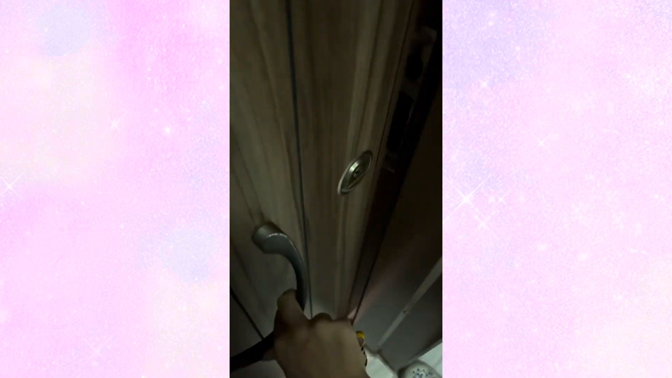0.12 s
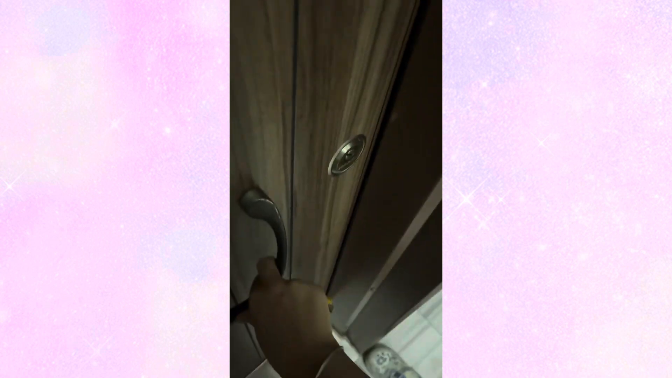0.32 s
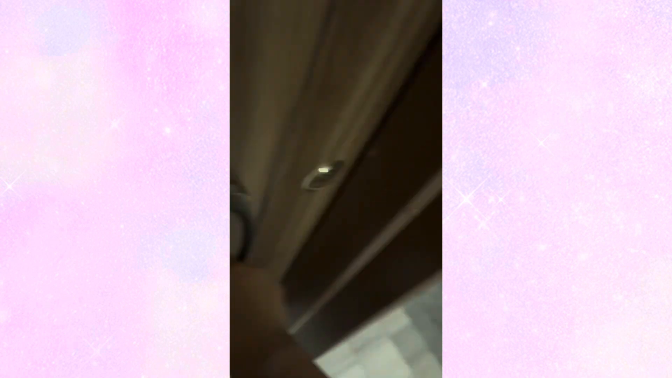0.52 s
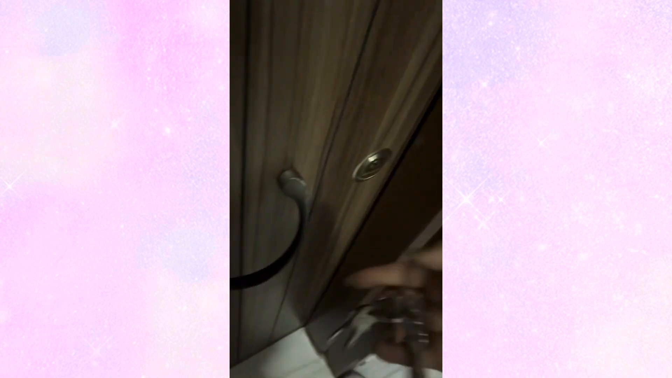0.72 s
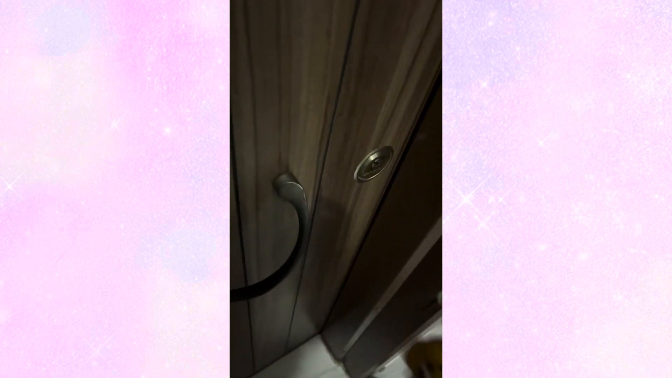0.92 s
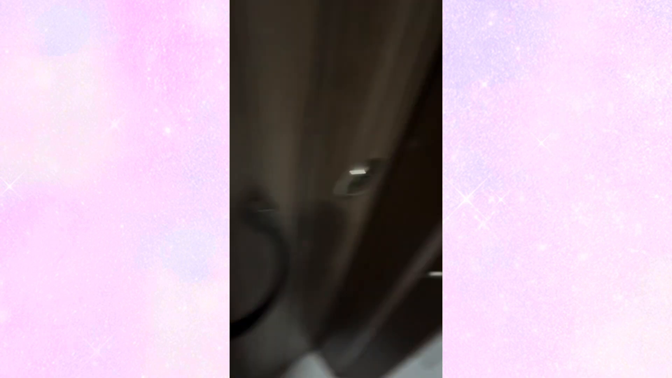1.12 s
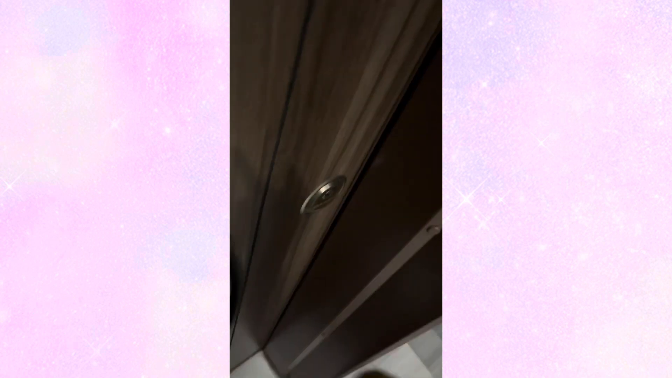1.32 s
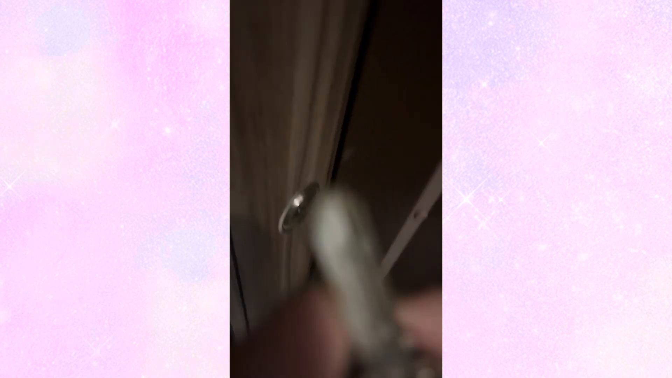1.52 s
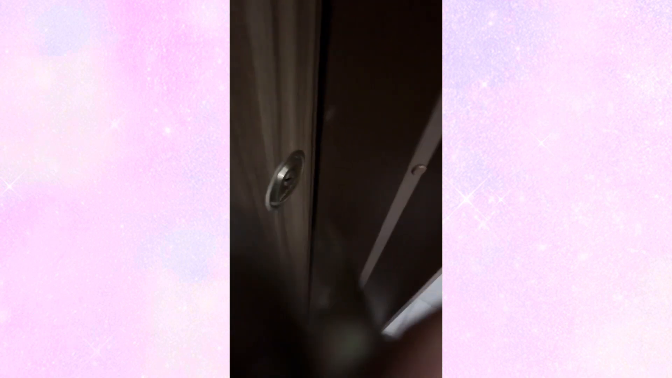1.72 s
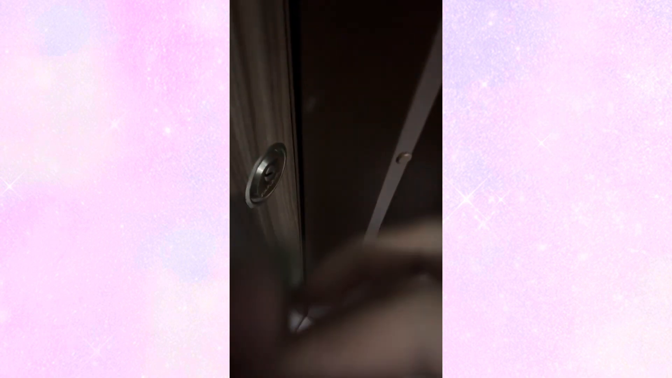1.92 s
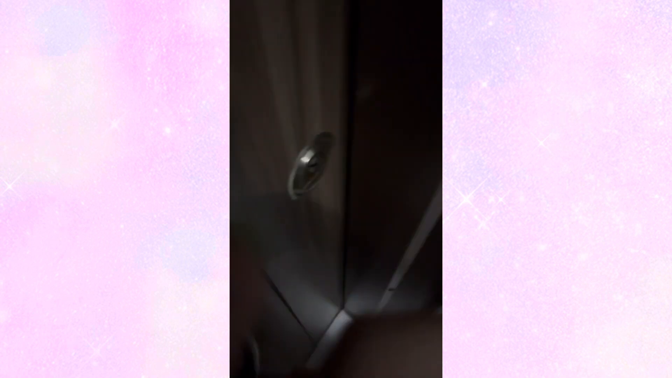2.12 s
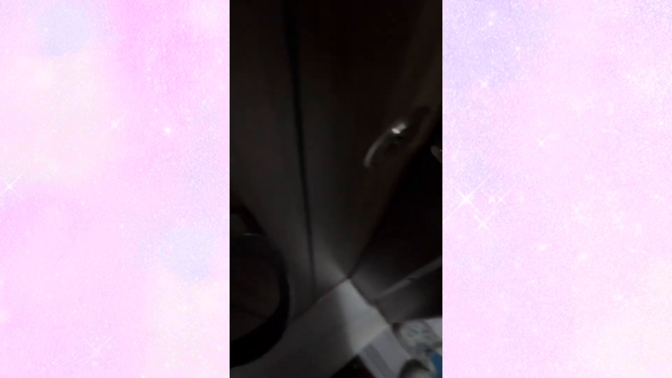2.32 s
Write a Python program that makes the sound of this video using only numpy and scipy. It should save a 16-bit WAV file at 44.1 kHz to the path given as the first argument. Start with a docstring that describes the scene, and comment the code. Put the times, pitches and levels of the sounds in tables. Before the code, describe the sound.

Door lock bolt clacking on an echoing landing, followed by jangling keys and a latch click.

```python
"""A door lock at arm's length from a stereo microphone, worked three times on a hard-walled landing.
The bolt slides and hits its stop, and each clack rings through the door and echoes off the walls.
A bunch of keys then clinks in the hand and jangles right by the microphone, key striking key,
with soft bumps and rubs of handling. At the end the door knocks in its frame and the latch clicks."""
import sys
import numpy as np
from scipy import signal
from scipy.fft import rfft, irfft
from scipy.io import wavfile

SR = 44100
rng = np.random.default_rng(int(sys.argv[2]) if len(sys.argv) > 2 else 0)


def materialize(psi):
    """Save the field psi as 16-bit PCM at rate SR to the path in sys.argv[1].

    A 1-D psi becomes a single channel; in a 2-D psi each row is a channel.
    """
    bounded = np.clip(np.atleast_2d(psi).T, -1, 1)
    quanta = np.round(bounded * 32767).astype(np.int16)
    wavfile.write(sys.argv[1], SR, quanta)


N = 110250
T = np.arange(N) / SR
FREQS = np.arange(N + 1) * SR / (2 * N)

# Still air on the landing. Each row: frequency in Hz, level in dB.
AIR_SPECTRUM = [(25, -41.5), (120, -44), (300, -51.5), (700, -60), (1600, -57.5), (3200, -54.5),
                (6000, -63.5), (10000, -74), (16000, -71.5)]
# Hand and sleeve, close up. Each row: middle in seconds, level in dB, half length in seconds, centre in Hz.
RUBS = [(0.142, -39.5, 0.034, 1070), (1.113, -47, 0.046, 1130), (1.627, -45.5, 0.032, 3400),
        (1.68, -40, 0.016, 755), (1.724, -44, 0.025, 2940), (1.885, -41.5, 0.0084, 1390),
        (1.966, -34, 0.024, 1340), (2.064, -48, 0.051, 1370)]

# Blows of the bolt. Each row: impact in seconds, level in dB, rise and slide before the stop in seconds,
# then slide, bass, body, snap, treble and door ring in dB, and the door's favoured pitch in Hz.
CLACKS = [(.211, -11.5, 0.0055, .007, -9, -12, -0.5, 3.5, 0.5, 1.5, 350),
          (0.279, -11.5, 0.00084, .005, -10, -13, 7, -3, 3, -1, 257),
          (0.287, -22.5, 0.0011, .002, 5, -11, 2, -1, -4, -11.5, 300),
          (0.4035, -7.5, 0.0079, .013, -11, -0.5, -3, -1, .5, -0.5, 155)]
# Tone of the lock case. Each row: frequency in Hz, gain in dB.
CASE_SPECTRUM = [(40, -0.5), (140, 4.5), (300, 5), (560, 1), (1000, 1.5), (2000, 0), (3300, 3), (5000, -3),
                 (6500, -12), (8800, -9.5), (10200, -24), (12000, -8.5), (16000, -30.5)]
# Modes of the door leaf. Each row: pitch in Hz, level in dB, T60 in seconds.
DOOR_MODES = [(96.5, -34, .5), (150, -38.5, 0.8), (221, -42, 1.8), (254.7, -30, 0.37), (272.5, -37.5, 0.97),
              (304.7, -33, .25), (344.4, -30.5, 0.33), (440.3, -36, .3), (708.6, -34.5, 0.36),
              (971, -25.5, 0.13), (1413, -33.5, 0.28), (3268, -19.5, 0.063)]
# The leaf rebounding. Each row: start in seconds, level in dB, pitch in Hz, T60 in seconds.
REBOUNDS = [(.4215, -9, 238, 0.031), (.445, -17.5, 138.6, 0.075)]

# Key striking key. Each row: time in seconds, click and ring in dB, ring T60 and rattle length in seconds.
CLINKS = [(0.639, -38, -50.5, 0.12, 0.0091), (0.657, -31, -41, 0.19, 0.016), (.775, -45, -37.5, 0.4, 0.02),
          (.826, -14.5, -33.5, 0.2, 0.0054), (0.838, -19, -49, 0.16, 0.0074),
          (0.9674, -22.5, -40, .04, 0.0026), (1.05, -45, -33.5, .16, 0.015),
          (1.259, -24, -44.5, 0.15, .004), (1.294, -27.5, -41, 0.14, .017),
          (1.333, -37, -49, 0.086, 0.0072), (1.389, -23.5, -39.5, 0.041, 0.0038),
          (1.4743, -26, -37.5, .15, 0.0044), (1.527, -30.5, -55, .07, 0.0021),
          (1.593, -28.5, -41.5, 0.15, 0.022), (1.8718, -25.5, -56, 0.035, 0.0031),
          (1.897, -23.5, -53, 0.044, 0.0025), (1.915, -30, -46.5, 0.058, 0.0054),
          (1.9287, -17, -47, .05, 0.0036), (1.971, -21, -33, 0.12, 0.0049), (1.98, -10, -26.5, 0.17, 0.015),
          (1.998, -11.5, -21, 0.42, .007), (2.068, -22.5, -25, 0.19, 0.011),
          (2.093, -29, -36, 0.19, 0.0064), (2.144, -35, -33.5, 0.25, 0.012), (2.182, -29, -22, 0.05, 0.012),
          (2.212, -23.5, -33.5, 0.13, 0.012), (2.2335, -16, -38.5, 0.069, 0.0041),
          (2.2378, -18, -27, 0.031, 0.0047), (2.289, -29, -64, 0.044, .002)]
# Modes of the keys. Each row: pitch in Hz, gain in dB, factor on the ring time.
KEY_MODES = [(2120, -22.5, 0.73), (5020, -21, 0.94), (6430, -24.5, 0.91), (6514, -20, 1.4),
             (7590, -15.5, 0.72), (8910, -10.5, 0.95), (9210, -22, 1.6), (10940, -7.5, 0.72),
             (11650, -2, 0.7), (11650, -10.5, 0.61), (13700, -10, 0.73), (14000, -7, 0.82),
             (15338, -7, 0.78)]
# Tone of a key's click. Each row: frequency in Hz, gain in dB.
CLICK_SPECTRUM = [(300, -16), (2000, -15.5), (4000, -8), (5600, -10), (7500, -11.5), (9000, -15),
                  (10100, -20), (11300, -3), (12500, -0.5), (14500, -18), (16000, -2)]
# The swing of the bunch, which keeps the keys chafing. Each row: time in seconds, level in dB.
CHAFE_LEVELS = [(.6, -56), (.67, -65), (.85, -39), (1.01, -63.5), (1.1, -52.5), (1.33, -41.5), (1.45, -59),
                (1.69, -56), (1.83, -78), (1.96, -41.5), (2.2, -37.5), (2.3, -75.5), (2.38, -84)]
# The hand bumping the microphone. Each row: start in seconds, level in dB, pitch in Hz, T60 in seconds.
BUMPS = [(1.256, -44, 71.4, 0.23), (1.926, -22, 114, 0.046), (1.991, -29.5, 61.4, 0.078)]

# The door against its frame. Each row: pitch in Hz, level in dB, T60 in seconds.
KNOCK_MODES = [(130, -41, 0.83), (177.4, -29.5, 0.13), (266, -30, 0.13), (533, -50, 0.53)]
# Tone of the latch's snap. Each row: frequency in Hz, gain in dB.
LATCH_SPECTRUM = [(60, -18), (250, 2.5), (700, 3), (1500, -6), (2600, -3.5), (3500, -3), (5500, -16.5),
                  (9500, -31), (12000, -19), (16000, -31)]
# The latch ringing in the wood. Each row: pitch in Hz, level in dB, T60 in seconds.
LATCH_MODES = [(970, -29.5, 0.026), (1234, -34.5, .05), (2297, -38, 0.097), (3290, -45.5, 0.14)]
# Echo of the landing. Each row: frequency in Hz, T60 in seconds, level in dB.
LANDING_ECHO = [(80, 0.56, -8.5), (242, 1.04, -6.5), (594, 1.12, -10), (1480, 1.13, -8.5),
                (3900, 0.98, -16), (7540, 0.94, -9), (11000, 0.57, -30.5), (15900, .3, -37.5)]

DOOR_LAG_S, HAND_LAG_S = 0.00008, -0.000068  # how much later the left channel hears each source
LEAD_IN = 0.35  # share of a clink's rattle length that comes before its main contact


def amp(db):
    """Decibels to gain."""
    return 10 ** (np.asarray(db) / 20)


def fade(t60):
    """Exponential decay, 60 dB down after t60 seconds."""
    return np.exp(-np.log(1000) * T / max(t60, 1e-3))


def along(table, hz, column=1):
    """Read a table on a log-frequency axis."""
    rows = np.array(table, float)
    return np.interp(np.log(hz + 1), np.log(rows[:, 0]), rows[:, column])


def hump(hz):
    """Bell over frequency, about an octave wide each way."""
    return np.exp(-np.log2((FREQS + 1) / hz) ** 2 / 2)


def colour(x, db):
    """Minimum-phase filter with the given gain at each frequency."""
    cepstrum = irfft(db * np.log(10) / 20)
    cepstrum[1:N] *= 2
    cepstrum[N + 1:] = 0
    return irfft(rfft(x, 2 * N) * np.exp(rfft(cepstrum)))[..., :N]


def add(out, x, start):
    """Mix a sound in at start seconds."""
    i = int(np.clip(start * SR, 0, N - 1))
    n = min(N - i, x.shape[-1])
    out[:, i:i + n] += x[..., :n]


def stereo_noise(lag_s, alike_hz=1210):
    """Noise at the microphone: the channels are mostly alike in the bass and differ above alike_hz."""
    common, left, right = rfft(rng.standard_normal((3, N)), 2 * N)
    own_share = 0.26 + 0.69 * FREQS / (FREQS + alike_hz)
    delay = np.exp(-2j * np.pi * FREQS * lag_s)
    shared = np.sqrt(1 - own_share) * np.array([common * delay, common])
    return irfft(shared + np.sqrt(own_share) * np.array([left, right]))[:, :N]


def grit(spread_db, size):
    """Uneven strength of tiny contacts, each size samples long; rms 1."""
    strength = np.repeat(amp(spread_db * rng.standard_normal(N // size + 1)), size)[:N]
    return strength / np.sqrt(np.mean(strength ** 2))


def ring(modes):
    """Damped modes after a blow."""
    return sum(amp(db) * fade(t60) * np.sin(2 * np.pi * hz * T) for hz, db, t60 in modes)


def still_air():
    """Faint, steady room tone, strongest in the bass."""
    return colour(stereo_noise(lag_s=0), along(AIR_SPECTRUM, FREQS))


def sleeve_rubs():
    """Hand and sleeve rub by the microphone in brief swells of friction noise."""
    out = np.zeros((2, N))
    friction = stereo_noise(HAND_LAG_S) * grit(spread_db=3.5, size=90)
    for at, db, half_s, hz in RUBS:
        swell = np.exp(-((T - at) / half_s) ** 2 / 2)
        out += colour(friction * swell, db + 16 * (hump(hz) - 1))
    return out


def lock(rattle_db=-11.5, focus_db=8.5):
    """The bolt scrapes to its stop, rattles the case and rings the door, which rebounds in its frame."""
    out = np.zeros((2, N))
    noise = stereo_noise(DOOR_LAG_S) * grit(spread_db=1, size=24)
    case_decay = fade(0.057) + amp(rattle_db) * fade(0.23)
    for at, db, rise, slide, slide_db, bass_db, body_db, snap_db, treble_db, door_db, door_hz in CLACKS:
        ahead = abs(T - at)
        approach = np.hypot(np.exp(-ahead / rise), amp(slide_db) * np.exp(-ahead / slide))
        force = (T < at) * approach * np.ones((2, 1))
        add(force, case_decay, at)
        tone = along(CASE_SPECTRUM, FREQS) + bass_db * hump(90) + body_db * hump(900)
        tone += snap_db * hump(3100) ** 8 + treble_db * hump(11000)
        out += colour(noise * force, tone + db)
        leaf = []
        for hz, mode_db, t60 in DOOR_MODES:
            favour_db = focus_db * np.exp(-4 * np.log2(hz / door_hz) ** 2)
            leaf.append((hz, mode_db + door_db + favour_db + (bass_db if hz < 200 else 0), t60))
        add(out, ring(leaf) * (1 - fade(0.015)), at)
    for at, db, hz, t60 in REBOUNDS:
        add(out, ring([(hz, db, t60)]) * (1 - fade(0.0095)), at)
    return out


def key_contacts(length_s, size, count=14, bounce_db=-5, scatter_db=4):
    """One main contact in a flurry of lighter bounces."""
    out, span = np.zeros(size), length_s * SR
    bounces = amp(bounce_db + scatter_db * rng.standard_normal(count))
    out[(rng.beta(2, 3, count) * 2 * span).astype(int)] = bounces
    out[int(LEAD_IN * span)] = 2
    return out / np.linalg.norm(out)


def key_ring(contacts, hz, db, t60, chatter_hz=8, scatter_db=3.5):
    """Modes struck anew by every contact and blurred by chatter."""
    t = T[:len(contacts)]
    phase_steps = rng.standard_normal((len(hz), len(t))) * np.sqrt(2 * np.pi * chatter_hz / SR)
    turn = np.exp(1j * (2 * np.pi * hz[:, None] * t + np.cumsum(phase_steps, axis=1)))
    decay = np.exp(-np.minimum(np.log(1000) * t / t60[:, None], 60))
    modes = np.cumsum(contacts * turn.conj() / decay, axis=1) * turn * decay
    modes *= (np.linalg.norm(decay, axis=1) / np.linalg.norm(modes, axis=1))[:, None]  # one blow's energy
    # Each mode reaches left and right with its own strength and phase.
    strength = amp(db + scatter_db * rng.standard_normal((2, len(hz))))
    phase = np.exp(2j * np.pi * rng.random((2, len(hz))))
    return ((strength * phase) @ modes).imag


def keys(neighbours=10, size=13000, grip_s=2.243, grip_t60_s=0.039, grip_db=-21.5):
    """Keys collide and chafe; a free key rings on, a pinched one rings briefly and off pitch."""
    clicks, rings = np.zeros((2, N)), np.zeros((2, N))
    hz, mode_db, ring_factor = np.array(KEY_MODES).T
    click_decay = (fade(0.0054) + amp(-23) * fade(0.23))[:size]
    clatter_t60 = np.full(neighbours, 0.05)
    for at, click_db, ring_db, t60, length_s in CLINKS:
        contacts, start = key_contacts(length_s, size), at - LEAD_IN * length_s
        click = rng.standard_normal((2, size)) * click_decay
        add(clicks, amp(click_db) * signal.fftconvolve(click, contacts[None]), start)
        detune = 0.03 * np.exp(-t60 / 0.07) * rng.standard_normal(len(hz))
        add(rings, key_ring(contacts, hz * (1 + detune), ring_db + mode_db, t60 * ring_factor), start)
        # The longer a key rings free, the less its neighbours clatter.
        clatter_hz = rng.uniform(6000, 15800, neighbours)
        clatter_db = ring_db + 6 - 68 * t60 + along(CLICK_SPECTRUM, clatter_hz)
        add(rings, key_ring(contacts[:size // 3], clatter_hz, clatter_db, clatter_t60), start)
    # The fingers close on the bunch and damp it.
    grip = amp(np.maximum(-60 * np.maximum(T - grip_s, 0) / grip_t60_s, grip_db))
    swing = amp(np.interp(T, *np.array(CHAFE_LEVELS).T))
    chafe = swing * grit(spread_db=3, size=60) * rng.standard_normal((2, N))
    return rings * grip + colour(clicks + chafe, along(CLICK_SPECTRUM, FREQS))


def hand_bumps():
    """The hand bumps the microphone: two dull modes with a soft onset."""
    out = np.zeros((2, N))
    for at, db, hz, t60 in BUMPS:
        bump = ring([(hz, db, t60), (hz * 1.74, db - 0.5, t60 / 2)])
        add(out, bump * (1 - fade(0.026)), at)
    return out


def door_and_latch(knock_s=2.379, brush_db=-30, brush_hz=636, latch_s=2.4425, latch_db=-14.5):
    """The door brushes and knocks softly against its frame, then the latch snaps and rings in the wood."""
    out, noise = np.zeros((2, N)), stereo_noise(DOOR_LAG_S)
    knock = ring(KNOCK_MODES) * (1 - fade(0.02))
    brush = colour(noise * fade(0.087), brush_db + 30 * (hump(brush_hz) - 1))
    add(out, knock + brush, knock_s)
    snap_decay = fade(0.021) + amp(-12.5) * fade(0.12)
    snap = colour(noise * snap_decay, latch_db + along(LATCH_SPECTRUM, FREQS))
    add(out, snap + ring(LATCH_MODES), latch_s)
    return out


def landing_echo(x, build_s=0.01414):
    """Dense echo of hard walls, shorter and wider in the treble."""
    noise, response = rfft(rng.standard_normal((2, N)), 2 * N), np.zeros((2, N))
    centres = np.geomspace(60, 16000, num=12)
    for hz, pick in zip(centres, np.eye(len(centres))):
        band_power = np.interp(np.log(FREQS + 1), np.log(centres), pick)
        band = irfft(noise * np.sqrt(band_power))[:, :N]
        alike = 1 / (1 + (hz / 550) ** 2)
        mid, side = band[0] * np.sqrt((1 + alike) / 2), band[1] * np.sqrt((1 - alike) / 2)
        tail = fade(along(LANDING_ECHO, hz)) * (1 - fade(build_s))
        tail *= amp(along(LANDING_ECHO, hz, column=2)) / np.linalg.norm(tail)
        response += np.array([mid + side, mid - side]) * tail
    return signal.fftconvolve(x, response, axes=1)[:, :N]


def scene():
    """Lock and latch at arm's length; the keys close to the microphone, with less of the landing on them."""
    bolt = lock()
    close_up = keys() + sleeve_rubs() + hand_bumps()
    door = door_and_latch()
    echo = landing_echo(bolt + amp(-6) * close_up + amp(0.5) * door)
    return bolt + close_up + door + echo + still_air()


def record(dry):
    """The recorder cuts the top steeply above 15850 Hz."""
    return signal.sosfilt(signal.ellip(10, .2, 80, 15850, fs=SR, output="sos"), dry)


dry = scene()
out = record(dry)
materialize(out)
```